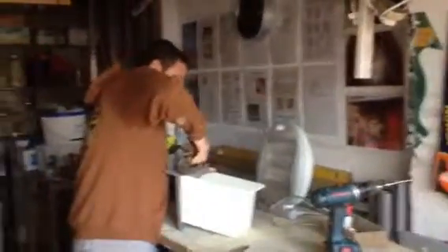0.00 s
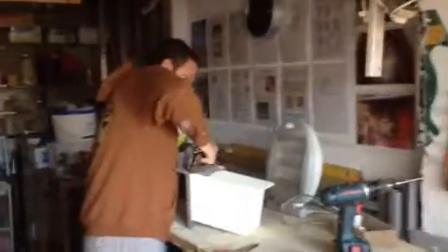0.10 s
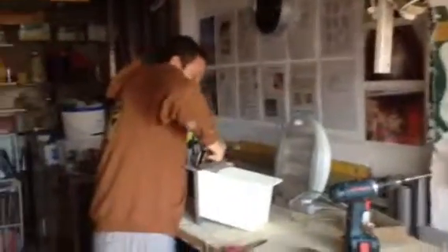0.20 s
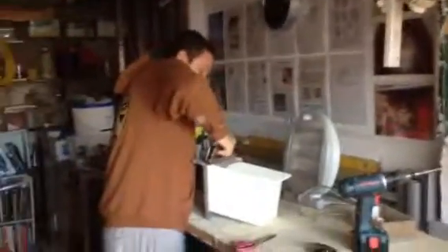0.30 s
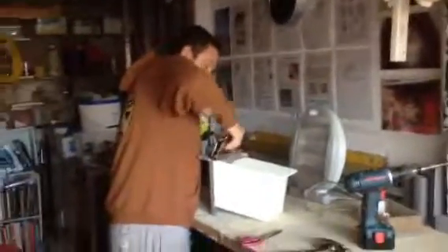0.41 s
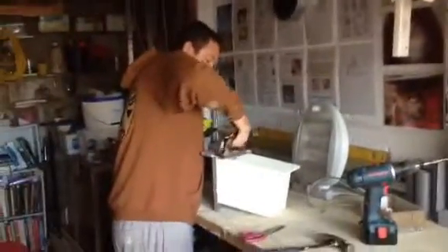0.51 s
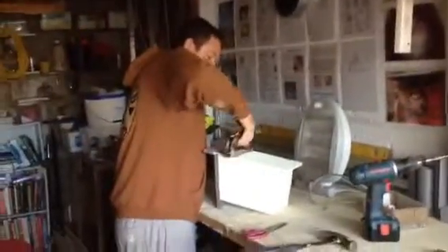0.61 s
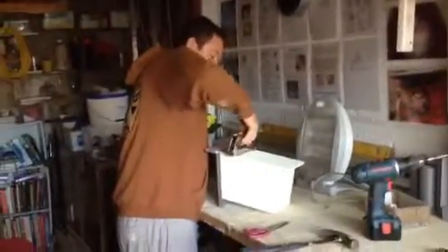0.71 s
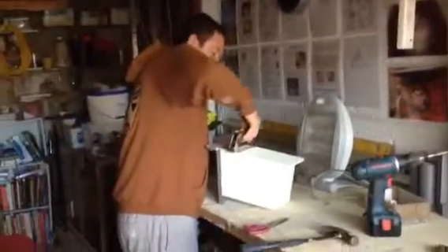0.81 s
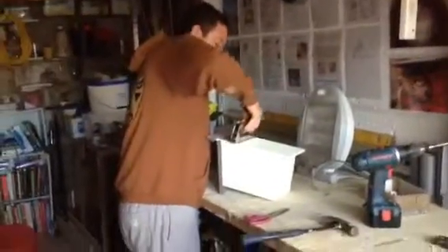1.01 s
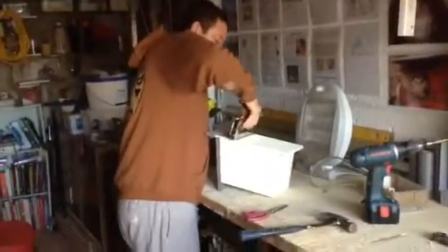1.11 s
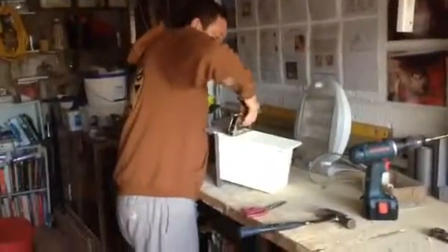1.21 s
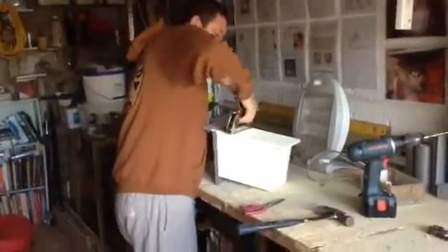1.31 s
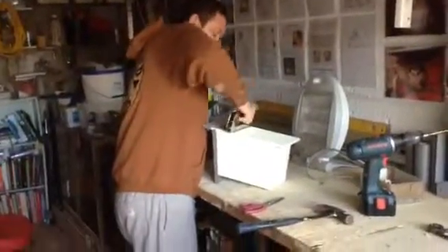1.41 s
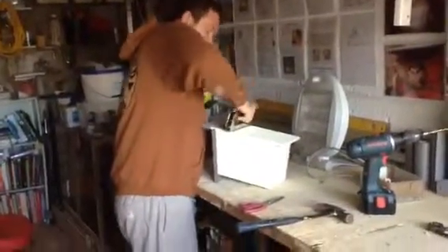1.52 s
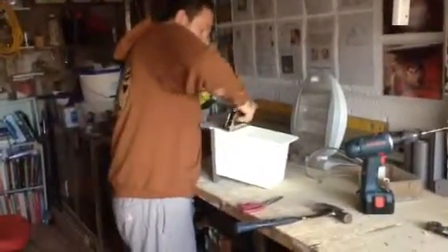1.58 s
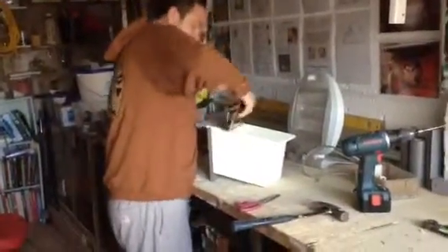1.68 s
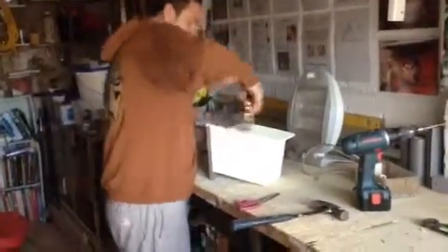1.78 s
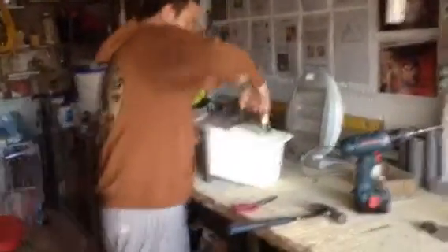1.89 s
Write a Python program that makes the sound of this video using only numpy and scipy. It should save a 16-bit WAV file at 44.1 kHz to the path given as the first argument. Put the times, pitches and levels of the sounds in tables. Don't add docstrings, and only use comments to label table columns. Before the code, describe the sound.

A hand staple gun snaps twice, over a second apart, each a bright steel crack with a hollow wooden knock. Small clicks, bumps and rubbing surround the shots; short dry workshop room, phone about two metres away.

```python
import sys
import numpy as np
from scipy import signal
from scipy.fft import rfft, irfft
from scipy.io import wavfile
from scipy.ndimage import uniform_filter1d

SR = 44100
rng = np.random.default_rng(int(sys.argv[2]) if len(sys.argv) > 2 else 0)


def how_loud(loudness_db):
    steps = np.asarray(loudness_db, float) / 20
    return 10 ** steps


def digitize_waveform(pressure):
    field = np.atleast_2d(pressure).T
    bounded = np.clip(field, -1, 1)
    quanta = np.round(bounded * 32767).astype(np.int16)
    wavfile.write(sys.argv[1], SR, quanta)


N = 83790
T = np.arange(N) / SR
SHORT = np.arange(4096) / SR
TAIL = T[:SR]

# (frequency [Hz], early t60 [s], late t60 [s], late level [dB])
ROOM = [(133, 0.45, 0.51, -25), (350, 0.23, 0.36, -29), (900, 0.13, 0.54, -31), (1938, 0.14, 0.69, -30),
        (4000, 0.13, 0.91, -37.5), (8000, .14, 0.33, -35), (13000, 0.097, 0.3, -39)]
ROOM_DB, ROOM_GAP_S = -1, 0.0026
MODE_ROOM_DB = -2.5
DAMPED_T60_S = 0.31
CONTACT_RISE_S = 0.0006
MODE_SPREAD_DB = 2

# (frequency [Hz], density [dB per Hz])
HUSH = [(18, -67), (30, -46.5), (168, -1), (284, -7), (315, -6), (897, -12.5), (1110, -11.5), (1720, -20),
        (15500, -31)]
HUSH_DB, FLICKER_DB = -71, 1.0

# (time [s], rub level [dB])
RUB = [(0, -81), (.08, -73.5), (.16, -69), (.2, -101), (.24, -65.5), (.5, -86.5), (.56, -104), (.605, -60),
       (.66, -80), (.9, -81), (1.0, -92.5), (1.28, -79), (1.33, -84), (1.4, -61.5), (1.47, -59.5),
       (1.52, -71.5), (1.72, -81.5), (1.79, -99)]
RUB_SHARES_DB = (-5.5, -5.5, -1.5, 1, -2.5)
RUB_GRAIN_DB = 1.2

# (frequency [Hz], level at the first place [dB], level at the second [dB], t60 [s])
LID = [(329, -2, -20, 0.048), (563, -19, -2, 0.041), (677, -14.5, 1, 0.042), (881.8, 7.5, 4.5, 0.041),
       (948, -11, 4, 0.03), (1466, -1.5, 1.5, 0.013), (1886, 5, 0.5, 0.023), (1985, -7, -1.5, 0.04),
       (2221, -3, -5.5, 0.026), (2565, -2.5, -9.5, 0.023), (3200, 7, -9.5, 0.014), (3353, 2, -5, 0.02),
       (3654, 4.5, -10.5, 0.017), (4703, -0.5, -6.5, 0.016)]
LID_RISE_S, LID_SWELL_TURNS = 0.001, 3.4

# (time [s], knock level [dB], steel level [dB], contact [s])
BUMPS = [(0.12, -67.5, -74, 0.0046), (0.174, -44.5, -105, 0.0051), (0.195, -52.5, -91, 0.0031),
         (0.6102, -34, -57, 0.003), (.618, -41.5, -63, 0.0043), (.63, -45.5, -93.5, 0.005),
         (.686, -59, -93.5, .005), (0.906, -60, -74.5, .006), (0.926, -64, -83, 0.0098),
         (1.32, -61.5, -99, .02), (1.435, -44, -99, 0.0085)]
# (frequency [Hz], level [dB], t60 [s])
BOX = [(156, -9, 0.049), (205, 1, 0.073), (325, -4, 0.075), (520, -5, 0.034), (710, -4.5, 0.038),
       (910, -1.5, .025), (1217, -10, .02), (1540, -5, .02), (2140, -7.5, 0.013), (2520, -15, .015),
       (4340, -16, .008)]
# (frequency [Hz], density [dB per Hz])
THUD = [(47, -50), (110, -22), (200, -2.5), (420, -5.5), (864, -9), (1370, -18.5), (1870, -14),
        (15500, -52.5)]
THUD_DB, THUD_T60_S = -2, 0.035

# (start [s], stop [s], frequency [Hz], level [dB], t60 [s])
SPRING = [(.225, .45, 1920, -66, 1.2), (.37, .44, 5750, -78, 1.5), (.458, .52, 3770, -64, .3),
          (.3, .45, 670, -64, 1.), (.52, .61, 2010, -74, 2.5), (.14, .17, 3650, -69, 2.5),
          (.14, .165, 5800, -72, 2.5), (.64, .87, 3806, -73, 1.0), (1.5, 1.72, 1938, -66, 1.2),
          (1.66, 1.76, 2360, -67, 2.5), (1.55, 1.7, 3790, -68, 1.), (1.7, 1.8, 3010, -69, 2.),
          (1.58, 1.74, 2498, -64, 1.6), (1.52, 1.72, 3180, -62, 1.0), (1.56, 1.745, 3293, -60, 2.5),
          (1.64, 1.7, 4180, -72, 1.), (1.59, 1.72, 4597, -63, 1.2), (1.62, 1.72, 3994, -74, 2.),
          (1.485, 1.72, 662, -57, .8), (1.83, 1.95, 3800, -66, .7)]
WAVER_DB, WAVER_RAD = 3.0, 0.8

# (time [s], steel level [dB], wood level [dB], chatter [s])
CLICKS = [(0.163, -53.5, -76, .003), (0.168, -44, -40, 0.0051), (0.179, -53.5, -60.5, .01),
          (0.19, -48.5, -62, 0.008), (.39, -68, -90.5, .006), (.575, -66.5, -90, .02),
          (0.2183, -40, -62, 0.002), (0.451, -55, -77, 0.004), (0.456, -44.5, -75, .002),
          (1.395, -63, -79.5, 0.0036), (1.43, -48, -39, 0.0039), (1.434, -43, -41.5, 0.012),
          (1.451, -48.5, -54.5, 0.0096), (1.4795, -34.5, -69.5, 0.0016), (1.71, -70, -84, 0.00076),
          (1.7325, -56, -81, .004), (1.723, -62.5, -82.5, 0.0096), (1.7412, -45.5, -80, 0.0009),
          (1.805, -48.5, -70.5, 0.0034), (1.816, -58.5, -85.5, 0.0047), (1.838, -59.5, -84.5, .01),
          (1.8275, -47, -85.5, 0.0031)]
# (frequency [Hz], level [dB], t60 [s])
LATCH = [(1680, -9, .012), (3470, -4.5, .012), (3750, 4, .03), (4170, 0, .02), (4900, -9.5, .01),
         (5670, -8, 0.015), (7400, -6, .01), (7950, 0, .01), (10800, -12, .006), (10800, -9.5, 0.017),
         (13800, -13, .005)]
# (frequency [Hz], density [dB per Hz])
LATCH_HISS = [(600, -44), (1670, -8), (2600, -19.5), (3900, -4), (5830, -10), (8000, -9), (11500, -16),
              (15500, -22)]
LATCH_HISS_DB, LATCH_HISS_T60_S = 1, 0.025

# (time [s], steel level [dB], wood level [dB], chatter [s])
SHOTS = [
    (0.2202, -10.5, -49.5, 0.0006),
    (0.222, -21, -9, 0.007),
    (1.4807, -10.5, -56.5, 0.0011),
    (1.483, -32.5, -8.5, .008),
]
# (frequency [Hz], level [dB], t60 [s])
STEEL = [(1720, -22.5, 0.011), (3505, -6.5, 0.026), (3740, -0.5, 0.0089), (4671, -1.5, 0.0024),
         (4570, -7.5, 0.018), (5110, -11, 0.018), (5900, -6.5, 0.0038), (7820, -8.5, 0.006),
         (8057, -0.5, 0.0073), (9600, -13, 0.0024), (10130, -11, 0.0068), (11100, -7, 0.002),
         (14000, -12, 0.002), (14800, -12.5, .006)]
# (frequency [Hz], density [dB per Hz])
BRIGHT = [(290, -51.5), (500, -21.5), (1670, -6.5), (3330, -22), (3790, -4.5), (5830, -10), (8000, -11.5),
          (15500, -17.5)]
BRIGHT_DB, BRIGHT_T60_S = 1, 0.016
# (frequency [Hz], density [dB per Hz])
CRACK = [(59, -52.5), (100, -33.5), (898, -16), (1210, -5), (1490, 1.5), (3770, -2), (6260, -9.5),
         (7890, -0.5), (15500, -29)]
CRACK_DB, CRACK_T60_S = -3.5, 0.035

# (time [s], level [dB], length [s])
PUSHES = [
    (0.224, -38, .012),
    (1.481, -44.5, .012),
]

# (time [s], level [dB], contact [s])
BOOMS = [
    (0.24, -34.5, 0.0022),
    (.245, -46, 0.017),
    (1.55, -44.5, 0.0033),
    (1.515, -40.5, .02),
    (1.31, -66.5, 0.021),
    (0.92, -59, 0.026),
]
# (frequency [Hz], level [dB], t60 [s])
BENCH = [(94, -10.5, 0.049), (135, -0.5, 0.16), (165, -3.5, 0.12), (213, -6, 0.16)]
BENCH_NOISE_DB = -8.5

# (time [s], wood level [dB], steel level [dB], contact [s])
TAP = (1.2925, -47.5, -74, .003)
# (frequency [Hz], level [dB], t60 [s])
NOSE = [(300, -30, 0.034), (882, -4, .02), (929, 21, 0.019), (997, 5, 0.021), (1560, 0, 0.016),
        (1760, 11, .02)]
NOSE_NOISE_DB = -18

LOW_CUT_HZ, TOP_HZ, LIMIT = 105, 15250, 0.74


def unit(x):
    return x / np.sqrt(np.sum(x ** 2) + 1e-20)


def fade(t, t60):
    return np.exp(-np.log(1000) * t / t60)


def colour(x, table):
    hz, db = np.array(table).T
    n = x.shape[-1]
    f = np.maximum(np.arange(n // 2 + 1) * SR / n, 1)
    gain = how_loud(np.interp(np.log(f), np.log(hz), db))
    return irfft(rfft(x) * gain, n)


def ring(table, spread_db=0.0, swell_turns=1e-3):
    hz, db, t60 = np.array(table).T[:, :, None]
    luck = rng.standard_normal((2, len(table), 1))
    hz = hz * (1 + 0.0012 * luck[1])
    level = how_loud(db + spread_db * luck[0])
    swell = 1 - np.exp(-SHORT * hz / swell_turns)
    modes = level * np.sin(2 * np.pi * hz * SHORT) * fade(SHORT, t60) * swell
    return unit(np.sum(modes, axis=0))


def chatter(length):
    luck = rng.random((12, 2))
    at = length * 1.4 * luck[:, 0] * SR
    at[0] = 0
    rebound = 0.4 * luck[:, 1] * np.exp(-1.2 * luck[:, 0])
    pulses = np.zeros(len(SHORT))
    np.add.at(pulses, at.astype(int), np.where(at > 0, rebound, 1))
    return unit(pulses)


def room_bands():
    hz, early, late, late_db = np.array(ROOM).T[:, :, None]
    f = np.log(np.maximum(np.arange(SR // 2 + 1), 1))
    share = np.array([np.interp(f, np.log(hz[:, 0]), row) for row in np.eye(len(hz))])
    bands = irfft(share * rfft(rng.standard_normal(SR)), SR)
    slopes = (fade(TAIL, early) + how_loud(late_db) * fade(TAIL, late)) / np.sqrt(early)
    return bands, slopes * np.clip(TAIL / ROOM_GAP_S, 0, 1) ** 2


def hit(at, db, length, modes, room, tint, noise_db, noise_t60, damped=False):
    bands, slopes = room
    if damped:
        slopes = slopes * fade(TAIL, DAMPED_T60_S)
    tinted = colour(bands, tint)
    shift = rng.integers(SR)

    def tail(noise):
        return how_loud(ROOM_DB) * unit(np.sum(np.roll(noise, shift, axis=1) * slopes, axis=0))

    noise = np.roll(tinted.sum(axis=0), -shift)[:len(SHORT)]
    burst = unit(noise * fade(np.maximum(SHORT - length, 0), noise_t60))
    body = signal.fftconvolve(chatter(length), modes)[:len(SHORT)]
    y = how_loud(MODE_ROOM_DB) * signal.fftconvolve(modes, tail(bands))[:SR]
    y += how_loud(noise_db) * tail(tinted)
    y[:len(SHORT)] += how_loud(noise_db) * burst + body
    y *= np.clip(TAIL / CONTACT_RISE_S, 0, 1)
    out, start = np.zeros(N + SR), int(at * SR)
    out[start:start + SR] = 10 * how_loud(db) * y
    return out[:N]


def floor():
    hush = colour(rng.standard_normal(N), HUSH)
    steps = np.repeat(rng.standard_normal(N // 2000 + 1), 2000)[:N]
    flicker = uniform_filter1d(steps, size=2000)
    return hush / np.std(hush) * how_loud(HUSH_DB + FLICKER_DB * flicker)


def lid(place):
    modes = ring(np.array(LID)[:, [0, 1 + place, 3]], swell_turns=LID_SWELL_TURNS)
    return unit(modes * (1 - np.exp(-SHORT / LID_RISE_S)))


def rub():
    grit = rng.standard_normal(N) * how_loud(RUB_GRAIN_DB * rng.exponential(size=N))
    grit = grit / np.std(grit) * how_loud(np.interp(T, *np.array(RUB).T))
    scrape = colour(grit, CRACK)
    steel, wood, plain, box, bench = how_loud(np.array(RUB_SHARES_DB))
    bodies = steel * ring(STEEL) + wood * lid(1) + box * ring(BOX) + bench * ring(BENCH)
    carried = signal.fftconvolve(grit, bodies)[:N]
    return carried + plain * scrape * np.std(grit) / np.std(scrape)


def latch(at, db, length, room):
    modes = ring(LATCH, MODE_SPREAD_DB)
    return hit(at, db, length, modes, room, LATCH_HISS, LATCH_HISS_DB, LATCH_HISS_T60_S)


def bumps(room):
    out = np.zeros(N)
    for at, knock_db, steel_db, length in BUMPS:
        box = ring(BOX, MODE_SPREAD_DB)
        out += latch(at, steel_db, length, room)
        out += hit(at, knock_db, length, box, room, THUD, THUD_DB, THUD_T60_S, damped=True)
    return out


def spring():
    out = np.zeros(N)
    for start, stop, hz, db, t60 in SPRING:
        t = np.maximum(T - start, 0)
        steps = np.repeat(rng.standard_normal((2, N // 700 + 1)), 700, axis=1)[:, :N]
        waver = uniform_filter1d(steps, size=700)
        gate = np.clip(t / 0.01, 0, 1) * np.clip((stop - T) / 0.0076, 0, 1)
        tone = np.sin(2 * np.pi * hz * t + WAVER_RAD * waver[1])
        out += how_loud(db + WAVER_DB * waver[0]) * tone * fade(t, t60) * gate
    return out


def lid_blow(at, db, length, room):
    return hit(at, db, length, lid(int(at > 1)), room, CRACK, CRACK_DB, CRACK_T60_S)


def clicks(room):
    out = np.zeros(N)
    for at, steel_db, wood_db, length in CLICKS:
        out += latch(at, steel_db, length, room)
        out += lid_blow(at, wood_db, length, room)
    return out


def shots(room):
    out = np.zeros(N)
    for at, steel_db, wood_db, length in SHOTS:
        frame = ring(STEEL, MODE_SPREAD_DB)
        out += hit(at, steel_db, length, frame, room, BRIGHT, BRIGHT_DB, BRIGHT_T60_S)
        out += lid_blow(at, wood_db, length, room)
    return out


def push():
    out = np.zeros(N)
    for at, db, length in PUSHES:
        out += how_loud(db) * np.sin(np.pi * np.clip((T - at) / length, 0, 1)) ** 2
    return out


def booms(room):
    out = np.zeros(N)
    for at, db, length in BOOMS:
        out += hit(at, db, length, ring(BENCH), room, THUD, BENCH_NOISE_DB, THUD_T60_S, damped=True)
    return out


def tap(room):
    at, wood_db, steel_db, length = TAP
    tick = latch(at, steel_db, length, room)
    tock = hit(at, wood_db, length, ring(NOSE), room, THUD, NOSE_NOISE_DB, THUD_T60_S, damped=True)
    return tick + tock


def scene():
    room = room_bands()
    contacts = tap(room) + shots(room) + clicks(room) + bumps(room) + booms(room) + rub()
    cut = signal.butter(4, LOW_CUT_HZ, "highpass", fs=SR, output="sos")
    return (signal.sosfilt(cut, contacts) + push() + spring() + floor())[None]


def band_limit(x):
    return signal.sosfilt(signal.butter(12, 16280, fs=SR, output="sos"), x)


def record(dry):
    limited = LIMIT * np.tanh(dry / LIMIT)
    top_cut = signal.ellip(12, 0.2, 80, TOP_HZ, fs=SR, output="sos")
    mix = signal.sosfilt(top_cut, limited)
    return band_limit(mix)


dry = scene()
out = record(dry)
digitize_waveform(out)
```